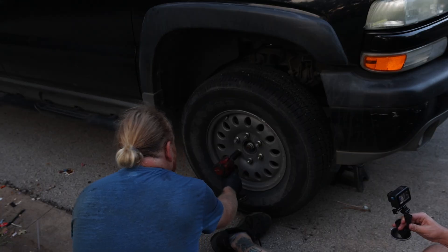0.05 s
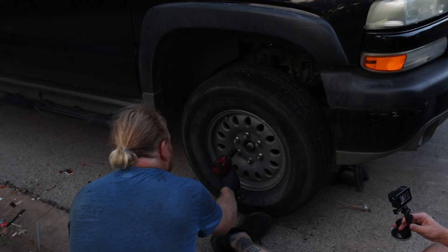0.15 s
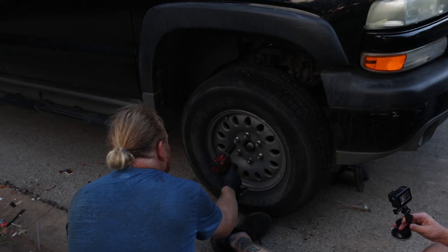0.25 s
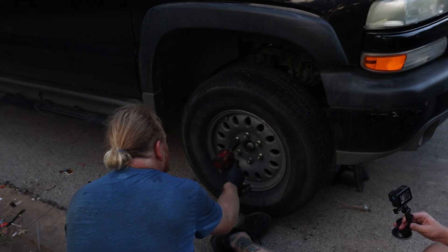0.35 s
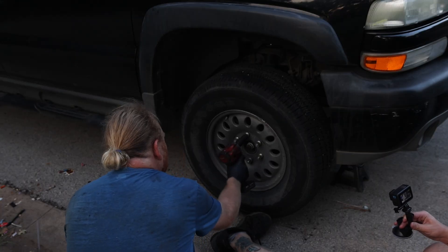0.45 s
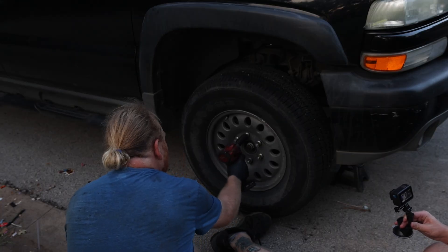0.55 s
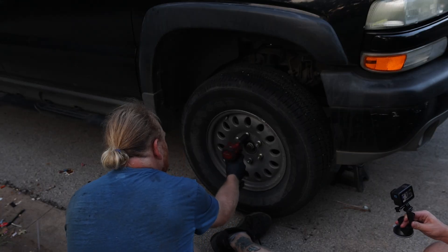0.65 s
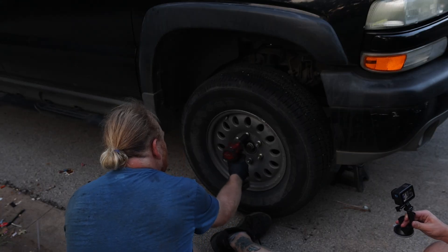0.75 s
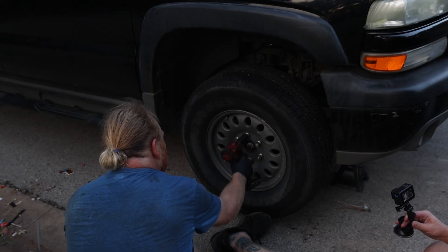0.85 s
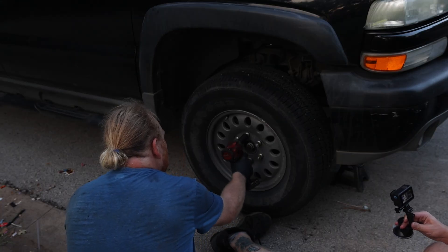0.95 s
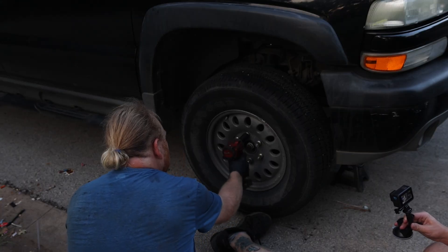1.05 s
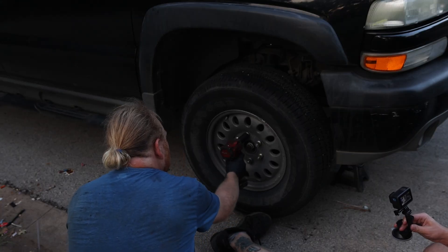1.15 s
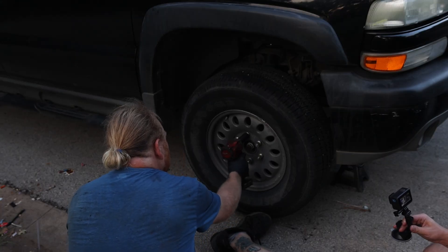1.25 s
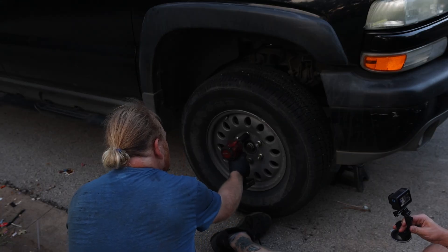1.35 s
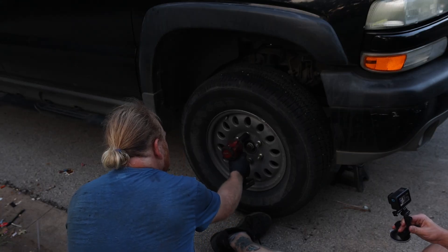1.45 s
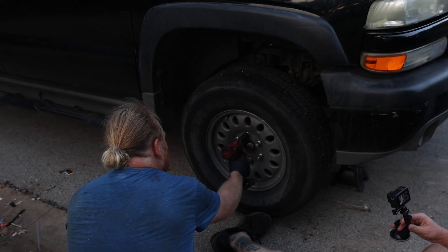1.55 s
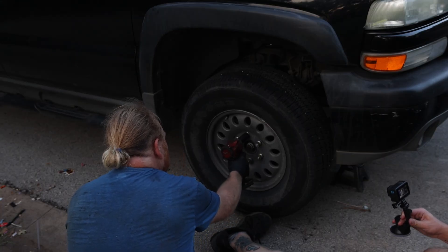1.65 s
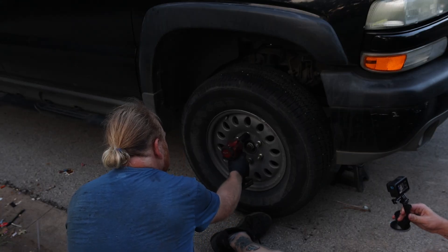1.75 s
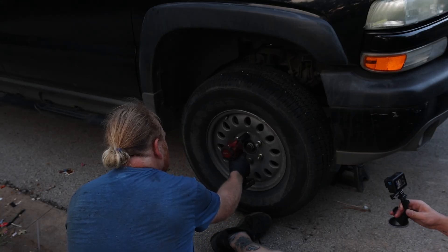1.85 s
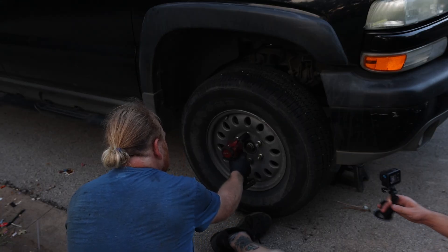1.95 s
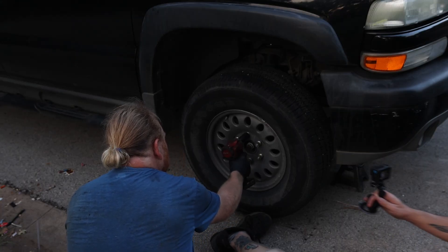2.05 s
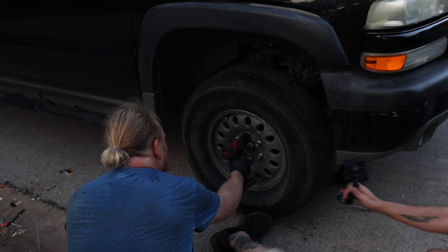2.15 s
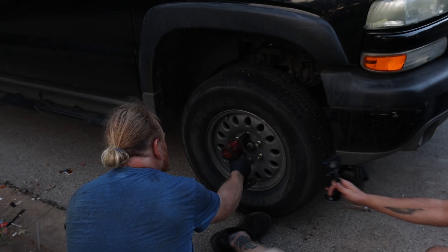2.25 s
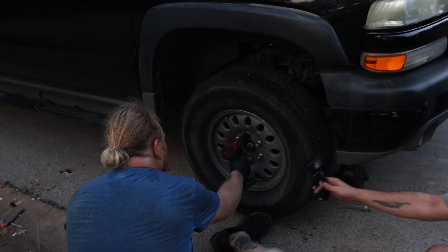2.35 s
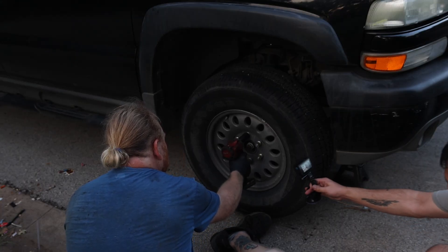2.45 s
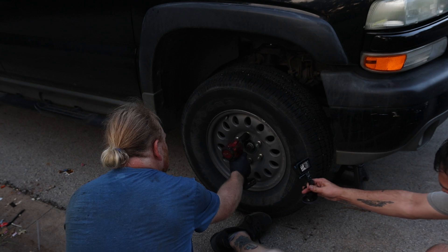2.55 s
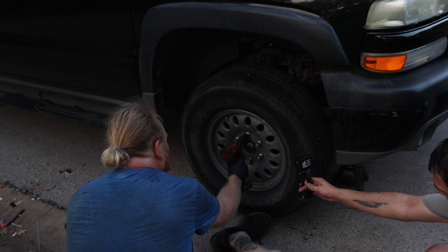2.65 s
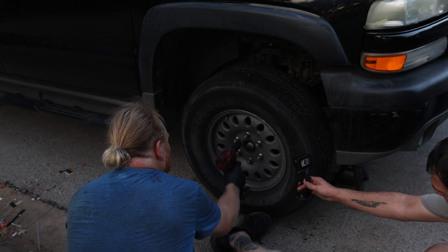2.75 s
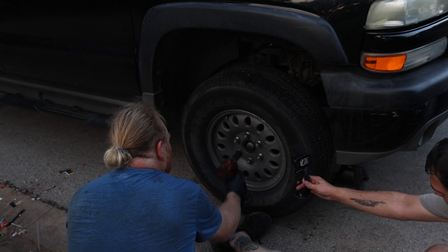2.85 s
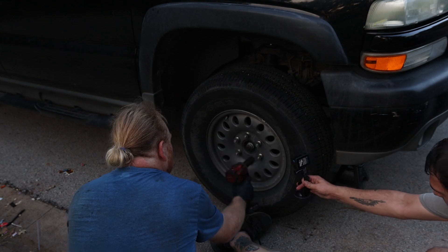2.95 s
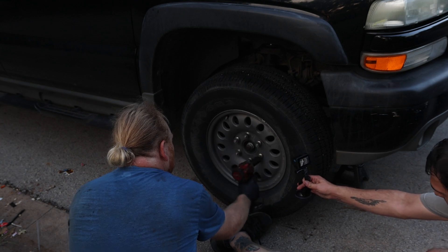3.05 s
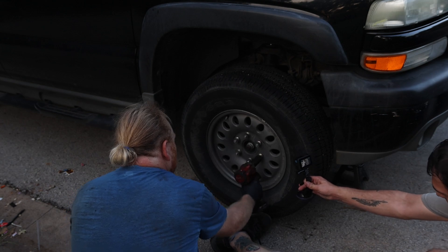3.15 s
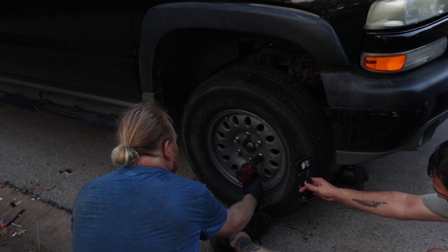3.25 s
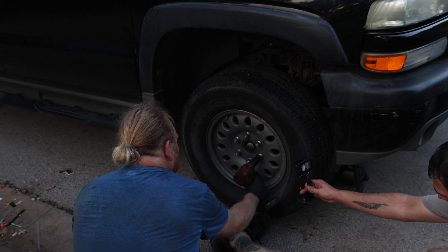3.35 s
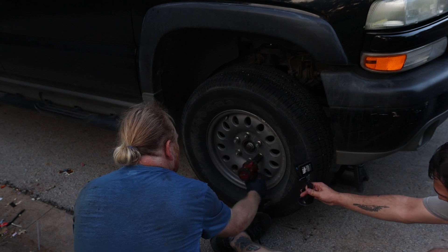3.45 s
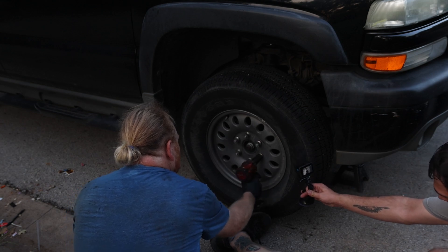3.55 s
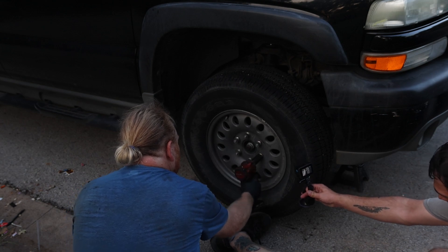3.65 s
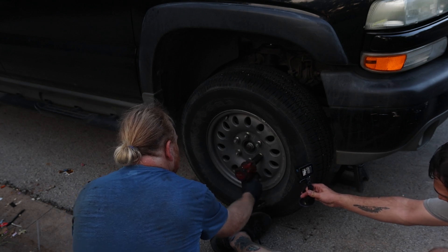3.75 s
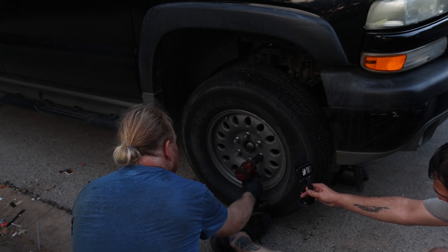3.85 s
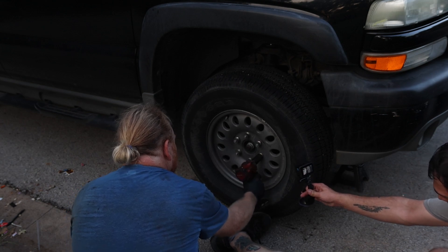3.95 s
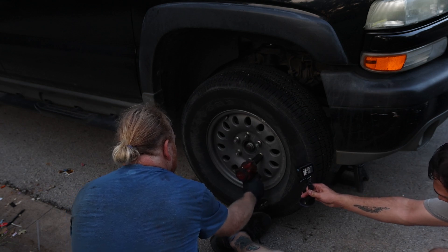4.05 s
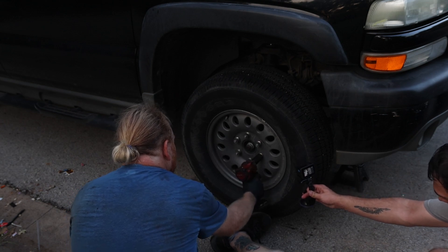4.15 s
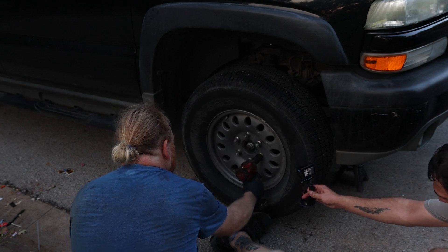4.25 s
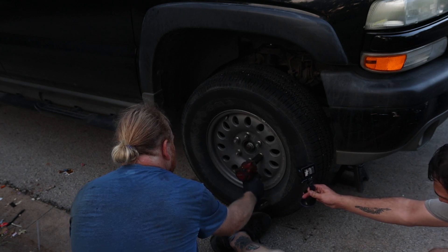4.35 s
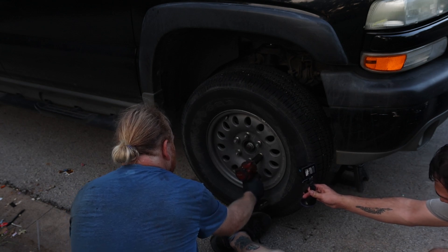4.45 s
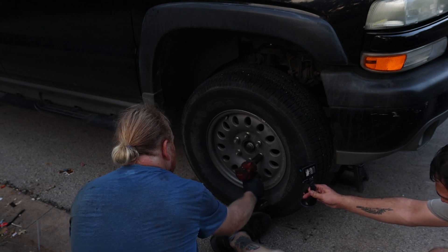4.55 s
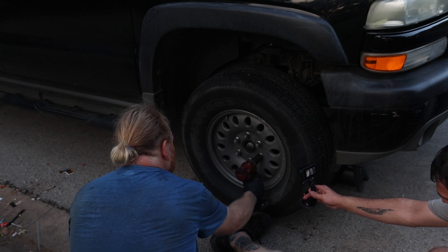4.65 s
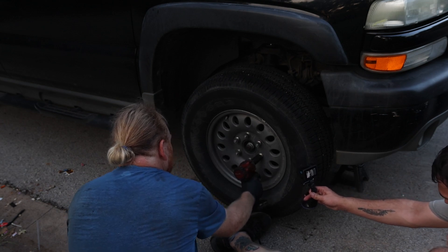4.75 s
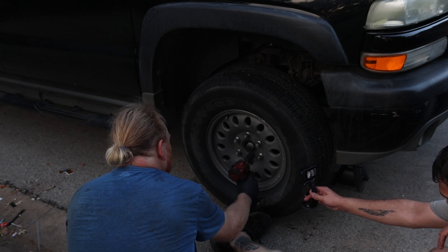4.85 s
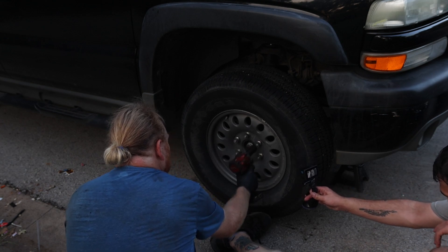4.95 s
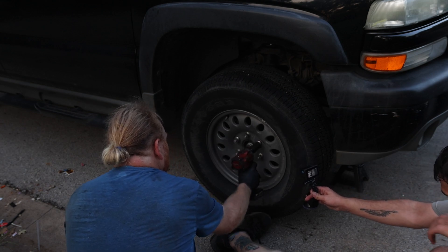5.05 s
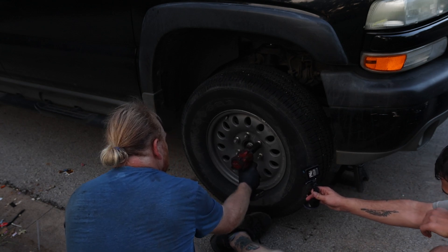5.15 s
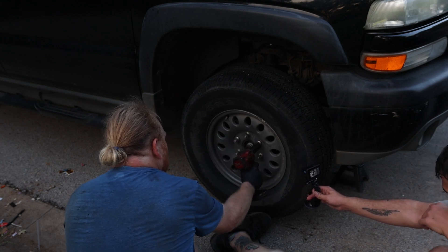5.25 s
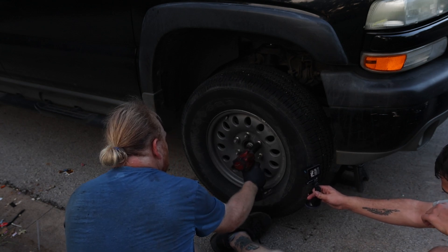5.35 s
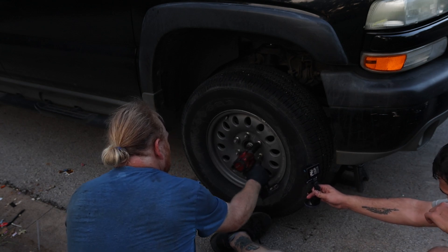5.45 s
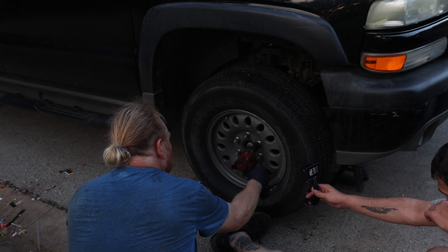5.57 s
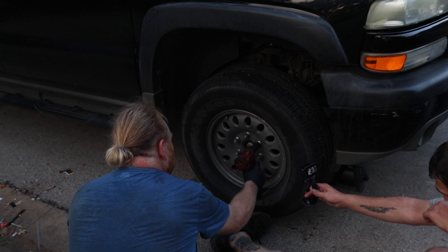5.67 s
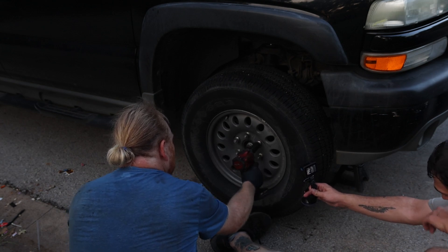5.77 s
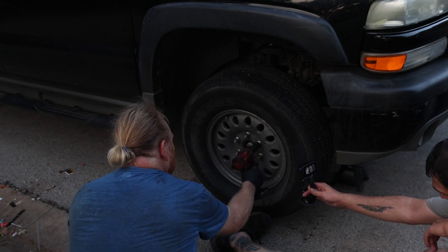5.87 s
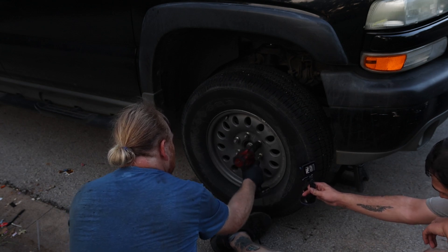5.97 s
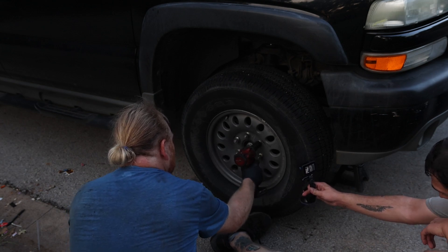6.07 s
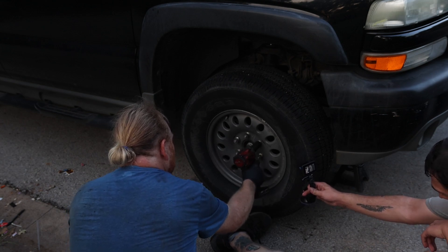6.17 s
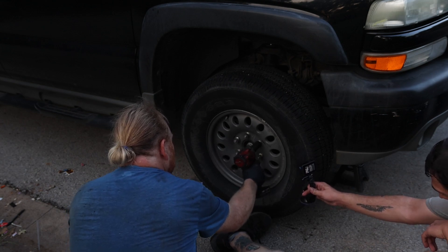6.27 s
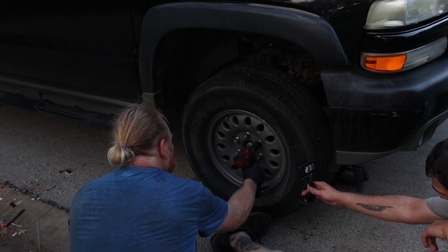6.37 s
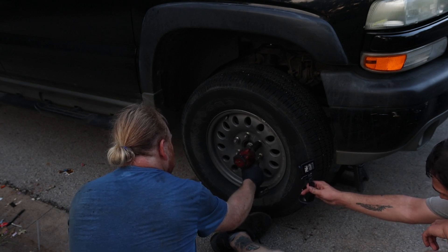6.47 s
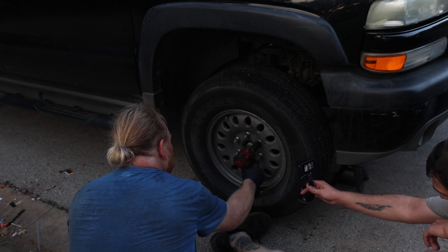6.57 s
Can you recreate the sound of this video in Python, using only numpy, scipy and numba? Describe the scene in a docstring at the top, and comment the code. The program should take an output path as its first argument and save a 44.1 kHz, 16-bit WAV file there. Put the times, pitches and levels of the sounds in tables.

```python
"""A cordless impact wrench finishes one lug nut of a steel truck wheel and drives three more, outdoors, close by.
Its motor chirps and spins up, then the hammer strikes the anvil about 53 times a second and the wheel rings.
Blows and clinks are shaped noise bursts that feed resonances; wheel and rim modes are decaying sine tones.
Between nuts the socket clinks on and off; behind it are a faint outdoor hum and puffs of wind on the microphone.
A gain control clamps down on the blows and lets the background swell back in the pauses."""
import sys
import numpy as np
from scipy import signal
from scipy.fft import rfft, irfft
from scipy.io import wavfile
from numba import njit

SR = 44100
rng = np.random.default_rng(int(sys.argv[2]) if len(sys.argv) > 2 else 0)


def store_wav(level_fs):
    """Save 16-bit WAV to argv[1]."""
    pcm = np.round(np.clip(np.atleast_2d(level_fs), -1, 1) * 32767)
    wavfile.write(sys.argv[1], SR, pcm.T.astype(np.int16))


N = 291501
TIME = np.arange(N) / SR

# broad resonances of socket and wheel at each nut: (frequency [Hz], width [Hz], level [dB])
BODY_A = [(530, 570, -2.5), (3660, 210, -20), (4130, 690, -2.5), (5570, 1800, -3.5), (13100, 410, -1)]
BODY_B = [(391.3, 33, 4), (580, 280, -9), (1044, 64, 3), (1500, 220, -6.5), (3970, 470, -9),
          (5300, 630, -10.5)]
BODY_C = [(612, 36, 4.5), (1166, 49, 0.5), (1630, 520, -8.5), (2640, 290, -10), (3660, 210, -14.5)]
BODY_D = [(540, 88, 2), (730, 79, 5), (1060, 30, 13.5), (2410, 570, -10), (3330, 48, 7), (3640, 80, -11)]
# trigger pulls: (start [s], end of free spin [s], gear level at start [dB], gear level at end [dB], chirp level [dB])
PULLS = [(1.237, 1.352, -61.5, -42, -61), (3.794, 3.942, -61, -40.5, -65),
         (5.915, 6.058, -51.5, -54.5, -60.5), (6.168, 6.275, -56.5, -47, -64)]


def undb(db):
    """Decibels to gain."""
    return 10 ** (np.asarray(db) / 20)


def unit(x):
    """Scale to rms 1."""
    return x / np.sqrt(np.mean(x ** 2))


def add(track, s, sound):
    """Mix a sound into a track at a time in seconds; what falls outside the track is cut off."""
    i = int(s * SR)
    sound, i = sound[max(-i, 0):], max(i, 0)
    track[i:i + len(sound)] += sound[:N - i]


def through(x, response):
    """Convolve with an impulse response."""
    return signal.fftconvolve(x, response)[:len(x)]


def colour(x, spectrum, size=8192):
    """Causal minimum-phase filter of unit power gain, shaped by (frequency [Hz], level [dB]) points."""
    hz, db = np.transpose(spectrum)
    bins_hz = np.arange(size // 2 + 1) * SR / size
    log_gain = np.log(undb(np.interp(np.log(bins_hz + 1), np.log(hz), db)))
    # folding the cepstrum onto positive time makes the filter causal
    cepstrum = irfft(log_gain)
    cepstrum[1:size // 2] *= 2
    cepstrum[size // 2 + 1:] = 0
    response = irfft(np.exp(rfft(cepstrum)))
    return through(x, response / np.linalg.norm(response))


def resonance(x, hz, width):
    """Band-pass with gain 1 at the centre."""
    return signal.lfilter(*signal.iirpeak(hz, hz / width, fs=SR), x)


def lowpass(x, hz, order=1):
    """Butterworth low-pass."""
    return signal.sosfilt(signal.butter(order, min(hz, SR / 2 - 1), fs=SR, output="sos"), x)


def fade(t60, size):
    """Exponential decay by 60 dB in t60 seconds."""
    return np.exp(-np.log(1000) * np.arange(size) / SR / t60)


def contact(grain, crack_t60, rattle_t60, rattle_db):
    """Steel on steel: a crack and a short rattle, with the energy of a hundredth of a second at rms 1."""
    burst = grain * (fade(crack_t60, len(grain)) + undb(rattle_db) * fade(rattle_t60, len(grain)))
    return burst / np.linalg.norm(burst) * np.sqrt(SR / 100)


def scatter(x, t60, top_hz, delay_s):
    """A dense, dull tail of reflections that starts after a delay."""
    tail = lowpass(rng.standard_normal(SR) * fade(t60, SR), top_hz, order=2)
    tail = tail * (TIME[:SR] > delay_s)
    return through(x, tail / np.linalg.norm(tail))


def walk(rate):
    """Slow chance: random values, rate of them a second, joined by straight lines, spread near 1."""
    steps = rng.standard_normal(int(TIME[-1] * rate) + 2)
    return 1.2 * np.interp(TIME * rate, np.arange(len(steps)), steps)


def ring(power, hz, t60, waver):
    """A mode stores the power of the blows and gives it off as a slightly wavering tone."""
    keep = np.exp(-2 * np.log(1000) / (t60 * SR))
    stored = signal.lfilter([1 - keep], [1, -keep], power + 1e-18)
    return np.sqrt(2 * stored) * np.sin(2 * np.pi * hz * TIME + waver * walk(54))


def turning(t, seats):
    """How freely the nut still turns: 1 while loose, 0 once seated."""
    seating_s = .0458
    return .5 * (1 - np.tanh((t - seats) / seating_s))


def strikes(first, seats, released, ends, full_hz):
    """Times of the blows of one burst: one for each half turn of the hammer."""
    sag_hz, recover_s = 5.81, .0735  # the rate starts low and recovers
    drag_hz = 5.23  # a nut that still turns drags on the rate until it seats
    brake_hz_per_s = 360  # the brake pulls the rate down after release
    t = first + np.arange(int((ends - first) * SR)) / SR
    rate = full_hz - sag_hz * np.exp((first - t) / recover_s)
    rate -= drag_hz * turning(t, seats)
    rate -= brake_hz_per_s * np.maximum(t - released, 0)
    half_turns = np.floor(np.cumsum(rate) / SR)
    times = t[np.diff(half_turns, prepend=-1) > 0]
    return times[(times > -1 / full_hz) & (times < TIME[-1] - .001)]


def disperse(delay_s, step_hz, size):
    """A click spread out by its way through the steel: equal strength at all pitches, each with its own delay."""
    hz = np.arange(size // 2 + 1) * SR / size
    delays = delay_s * rng.exponential(size=size)
    lag = np.interp(hz / step_hz, np.arange(size), delays)
    click = irfft(np.exp(-2j * np.pi * np.cumsum(lag) * SR / size))
    return click * np.hanning(2 * size)[size:] * np.sqrt(SR / 100)


def hammer(burst, body, nut_db, size=2048):
    """Two hammer lugs strike in turn, one a little harder: a snap, a thud that repeats and a loose rattle."""
    thud_db, lug_db, rattle_db, rattle_low_hz = -4.5, -7.5, -2.5, 650
    brake_db_per_s, grind_db = 74, 2.5  # blows weaken under the brake; a turning thread grinds
    _, seats, released, _, _ = burst
    thud = undb(thud_db) * lowpass(disperse(delay_s=.004, step_hz=90, size=size), 1200, order=2)
    lugs = [undb(lug_db) * disperse(delay_s=.0014, step_hz=150, size=size) for _ in range(2)]
    blows = np.zeros(N)
    for k, s in enumerate(strikes(*burst)):
        # chance in timing [s], force [dB], rattle decay (log) and snap [dB]
        late, force, tightness, square = rng.standard_normal(4) * [.0001, .4, .3, 2.5]
        grain = rng.standard_normal(size)
        rattle = contact(grain, crack_t60=.0024 * np.exp(tightness), rattle_t60=.052, rattle_db=3)
        rattle = rattle - lowpass(rattle, rattle_low_hz)
        blow = undb(rattle_db) * rattle + lugs[k % 2] + thud
        blow[0] += undb(12.5 + square)  # the snap is sharper when the lug lands square
        braking_db = brake_db_per_s * max(s - released, 0)
        uneven_db = .5 * (-1) ** k
        add(blows, s + late, undb(nut_db - braking_db + force + uneven_db) * blow)
    grind = undb(grind_db) * resonance(blows * turning(TIME, seats), 1730, 480)
    resonant = sum(undb(db) * resonance(blows, hz, width) for hz, width, db in body)
    return blows + grind + resonant


def skips(size=2048):
    """The hammer skips over the anvil as the motor runs down: dry ticks, ever weaker and further apart."""
    # run-downs: (first skip [s], skips end [s], first gap [s], first level [dB])
    rundowns = [(0.115, .125, .013, -44.5), (2.695, 2.775, 0.014, -41.5), (4.794, 4.84, .0172, -30.5)]
    slowing, fall_db = .04, 2.5  # each gap is longer by this share, each skip weaker
    out = np.zeros(N)
    for s, ends, gap, db in rundowns:
        while s < ends:
            tick = contact(rng.standard_normal(size), crack_t60=.0042, rattle_t60=.043, rattle_db=-5)
            add(out, s, undb(db) * tick)
            s += gap
            gap *= 1 + slowing
            db -= fall_db
    return out


def rim(runs):
    """Slow modes of the rim sing on after the hammering stops; each nut excites them differently."""
    # (frequency [Hz], t60 [s], level at first, second, third and fourth nut [dB])
    rim_modes = [(867, 1.25, -40, -48, -35, -42), (1114, 2.2, -38, -33, -40, -37),
                 (1480, 1.3, -44, -33, -50, -43)]
    singing = np.zeros(N)
    for hz, t60, *levels in rim_modes:
        power = sum((undb(db) * run) ** 2 for db, run in zip(levels, runs))
        singing += ring(power, hz, t60, waver=.1)
    return singing


def wrench():
    """Hammer blows with their clatter in the wheel dish, and the singing rim."""
    # one burst per nut: (first blow [s], nut seats [s], trigger released [s], hammering ends [s],
    # full rate [blows/s])
    bursts = [(-.2943, -.5, .0877, .14, 53.59), (1.3549, 1.896, 2.6237, 2.685, 53.59),
              (3.9266, 3.942, 4.7456, 4.775, 53.25), (6.2651, 6.309, 6.7, 6.75, 53.29)]
    # nuts in the order of the bursts: (body resonances, blow level [dB])
    nuts = [(BODY_A, -35.5), (BODY_B, -23.5), (BODY_C, -23), (BODY_D, -24)]
    # tone of a blow: (frequency [Hz], relative level [dB])
    blow_spectrum = [(90, -21), (270, -11.5), (375, -6.5), (750, -2.5), (900, -9.5), (1080, -3),
                     (1600, -2.5), (2500, 2.5), (4000, 0), (5800, -2), (7000, -7.5), (9200, -5.5),
                     (12000, -8.5), (16000, -14)]
    runs = [hammer(burst, *nut) for burst, nut in zip(bursts, nuts)]
    blows = colour(sum(runs) + skips(), blow_spectrum)
    clatter = undb(-12.5) * scatter(blows, t60=.13, top_hz=5600, delay_s=.0026)
    return blows + clatter, rim(runs)


def wheel(x):
    """The steel rings on in clear modes whose balance drifts at random, as if the point of contact shifted."""
    # quick modes of wheel and socket: (frequency [Hz], mean level [dB], t60 [s])
    wheel_modes = [(614, -12, .6), (2240, -5, .4), (2331, -1, .3), (2505, -5, .3), (2668, -2, .33),
                   (2950, 0, .33), (3050, -9, .55), (3316, -4, .32), (3640, 0, .28), (3860, -11, .6),
                   (3989, -2, .22), (4200, -8, .3), (4527, -12, .45), (4947, -9, .25), (5600, -12, .3),
                   (6675, -16, .25), (9388, -10, .11), (10900, -18, .16), (13400, -17, .25)]
    ringing = np.zeros(N)
    for hz, db, t60 in wheel_modes:
        drifting_db = db + 3.5 * walk(4)
        ringing += undb(drifting_db) * ring(x ** 2, hz, t60, waver=.35)
    return ringing


def shimmer(x):
    """The many weak modes of the wheel dish blend into a bright haze."""
    return resonance(scatter(x, t60=.24, top_hz=6460, delay_s=.0018), 3400, 2600)


def outdoors():
    """Distant traffic with a low hum and a thin hiss, all filtered noise; puffs of wind brush the microphone."""
    # tone of the air and of the wind: (frequency [Hz], relative level [dB])
    air_spectrum = [(20, -11.5), (58, -8.5), (90, -4), (170, -6.5), (400, -12.5), (800, -11.5), (1200, -14),
                    (2000, -22.5), (4000, -32), (7000, -41.5), (10500, -46), (13000, -31), (16000, -33.5)]
    wind_spectrum = [(12, -4), (28, -4), (55, -3.5), (90, -13), (150, -19.5), (300, -44), (800, -71)]
    # puffs: (peak [s], half width [s], level [dB])
    puffs = [(5.501, .16, -60), (5.865, .028, -53.5), (6.01, 0.064, -48.5)]
    air = colour(rng.standard_normal(N), air_spectrum)
    hum = undb(-8.5) * unit(resonance(resonance(rng.standard_normal(N), 58, 9), 58, 9))
    gust = sum(undb(db) * np.exp(-.5 * ((TIME - s) / width) ** 2) for s, width, db in puffs)
    return (air + hum) * undb(-68.5) + gust * colour(rng.standard_normal(N), wind_spectrum)


def ticks():
    """Slight knocks: the drive takes up its play just after each pull, and the socket feels for a nut."""
    # spans in which the socket is felt onto a nut; one that ends before it starts is silent: (start [s], end [s])
    fumbles = [(0.699, 1.1), (3.25, 3.2), (5.15, 5.8)]
    backlash_s, backlash_db, backlash_treble_db = .014, -68, 12.5
    gap_s, tick_db, spread_db, ring_db = .11, -75, 3, -11
    rows = [(pull[0] + backlash_s, backlash_db, backlash_treble_db, ring_db) for pull in PULLS]
    for start, end in fumbles:
        for s in np.arange(start, end, gap_s):
            moment = s + gap_s * (rng.random() - .5)
            rows.append((moment, tick_db + spread_db * rng.standard_normal(), 0, ring_db))
    return rows


def knocks(size=4096):
    """The first burst's last blow, then the socket pulled off and worked onto nuts: clinks, one click of the
    drive, and the wheel's share."""
    # clinks on nuts and wheel; the first is the ringing last blow of the first burst, and the one at 6.195 s is
    # a click of the drive just after a pull: # (time [s], level [dB], treble [dB], share into the wheel [dB])
    hits = [(0.13, -51, 18, -3.5), (.578, -43, 4, -8.5), (0.7452, -52, -16, -14),
            (0.8731, -43.5, 3.5, -8.5), (1.114, -63.5, 2, 0), (1.137, -44, -13.5, -12),
            (3.171, -44, 2, -12.5), (3.193, -43.5, -4.5, -18), (3.243, -49.5, -14, -26),
            (3.4157, -47, -6.5, -6.5), (3.522, -54.5, -12.5, -13), (3.641, -61.5, -0.5, -17),
            (5.117, -43.5, -5.5, -15.5), (5.318, -54, -25, -23), (5.551, -49.5, 4, -23),
            (5.654, -64, -11, -19), (6.039, -52.5, 11.5, -14), (6.077, -47, 5, -32),
            (6.195, -56, 10.5, -12), (6.243, -44, 5.5, -10)]
    # tone of a clink: (frequency [Hz], relative level [dB])
    clink_spectrum = [(80, -20.5), (200, -16.5), (370, 3), (700, 2), (1200, 0), (1800, 1), (2600, -0.5),
                      (3700, -2), (5400, -5.5), (7200, -18), (10000, -15.5), (16000, -25.5)]
    bounce_s, bounce_db = .015, -16.5  # every knock rebounds once
    dry, drive = np.zeros(N), np.zeros(N)
    for s, db, treble_db, ring_db in hits + ticks():
        for delay, weaker_db in ((0, 0), (bounce_s, bounce_db)):
            hit = contact(rng.standard_normal(size), crack_t60=.0064, rattle_t60=.092, rattle_db=5)
            hit = undb(db + weaker_db) * hit
            dull = lowpass(hit, 3500)
            hit = dull + undb(treble_db) * (hit - dull)
            add(dry, s + delay, hit)
            add(drive, s + delay, undb(ring_db) * hit)
    return colour(dry, clink_spectrum), colour(drive, clink_spectrum)


def motor():
    """The drive chirps, its tone splits into two sidebands as the rotor speeds up, and the gears whine upward."""
    # tone of the gears: (frequency [Hz], relative level [dB])
    gear_spectrum = [(100, -14), (400, -5), (1000, -4), (2400, 2), (4000, -3.5), (5500, -5.5), (7000, -18),
                     (10000, -17), (16000, -21.5)]
    gears, chirps = np.zeros(N), np.zeros(N)
    for start, end, first_db, last_db, chirp_db in PULLS:
        t = TIME[:int((end - start) * SR) + SR // 20]
        past_end = t + start - end
        speed = 1 - np.exp(-np.maximum(t - .016, 0) / .1)
        speed *= 1 - .26 * np.clip(past_end / .02 + 1, 0, 1) ** 2  # the load drags the rotor down

        angle = 2 * np.pi * np.cumsum(1600 * speed) / SR
        carrier = 2 * np.pi * 7780 * t
        tone = np.sin(carrier + angle) + .5 * np.sin(carrier - angle) * np.exp(-t / .1)
        fade_in_out = np.interp(t, [0, .003, .045, .075, .09], [0, .6, 1, .3, 0])
        add(chirps, start, undb(chirp_db) * tone * fade_in_out)

        # fast and slower jitter roughen the gear mesh
        jitter = 1 + .06 * rng.standard_normal(len(t)) + .045 * walk(130)[:len(t)]
        teeth = 2 * np.pi * np.cumsum(1600 * speed * jitter) / SR
        mesh = sum(np.sin(k * teeth + rng.uniform(0, 2 * np.pi)) for k in (4, 6, 7, 9))
        rush = rng.standard_normal(len(t)) * (1 + .4 * np.sin(angle / 9))
        whirr = .8 * rush + .27 * mesh
        swell = undb(np.interp(t, [0, end - start], [first_db, last_db])) * np.clip(speed / .36, 0, 1)
        add(gears, start, whirr * swell * np.exp(-np.maximum(past_end, 0) / .0082))
    return colour(gears, gear_spectrum) + chirps


@njit
def follow(size, held, lowest, attack, release):
    """Peak follower: climbs towards every peak above it and sinks steadily in between."""
    out = np.empty(len(size))
    for i in range(len(size)):
        held = max(held * release + attack * max(size[i] - held, 0.), lowest)
        out[i] = held
    return out


def gain_control(x):
    """Loud peaks pull the gain down quickly; it creeps back up in the pauses."""
    ceiling = undb(-16)  # the peak level it aims for
    max_boost_db, start_boost_db = 22.5, 9.5
    clamp_s, release_db_per_s, lookahead_s = .0063, 11.5, .0014
    held = follow(np.abs(x), ceiling / undb(start_boost_db), ceiling / undb(max_boost_db),
                  1 / (clamp_s * SR), undb(-release_db_per_s / SR))
    return x * ceiling / np.interp(TIME + lookahead_s, TIME, held)


def scene():
    """Wrench, socket and wheel, with a faint echo from the truck and the yard."""
    blows, singing = wrench()
    clinks, drive = knocks()
    ringing = wheel(undb(-34) * blows + undb(-11) * drive)
    haze = shimmer(undb(-25) * blows + undb(-9.5) * drive)
    work = blows + clinks + ringing + singing + haze + motor()
    yard = undb(-30) * scatter(work, t60=.6, top_hz=4800, delay_s=.028)
    return (work + yard + outdoors())[None]


def record(dry):
    """The gain control rides the level, soft saturation rounds the tallest peaks, and a steep filter cuts the top."""
    rounded = np.tanh(1.5 * gain_control(dry[0])) / 1.5
    top_cut = signal.ellip(10, .2, 70, 15900, fs=SR, output="sos")  # low-pass edge 15900 Hz
    return signal.sosfilt(top_cut, rounded)[None]


dry = scene()
out = record(dry)
store_wav(out)
```